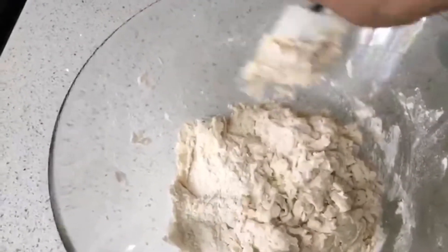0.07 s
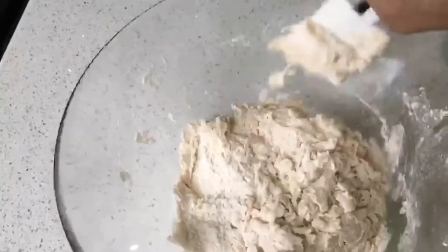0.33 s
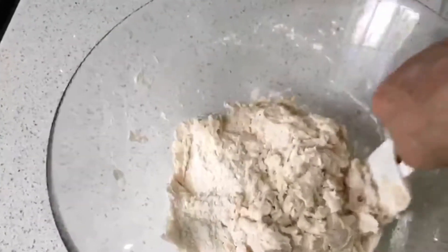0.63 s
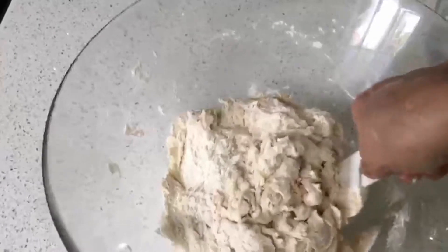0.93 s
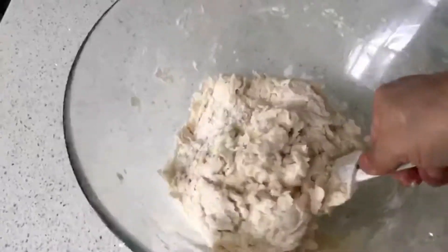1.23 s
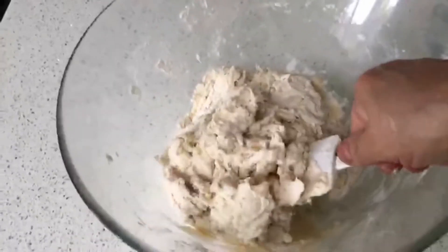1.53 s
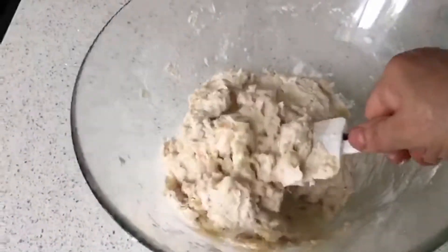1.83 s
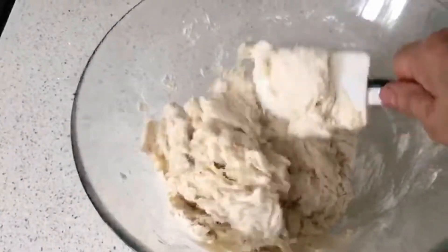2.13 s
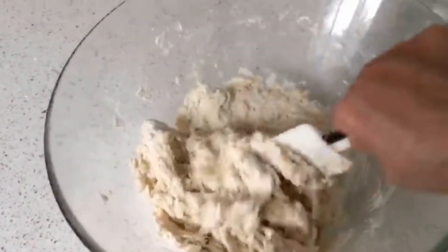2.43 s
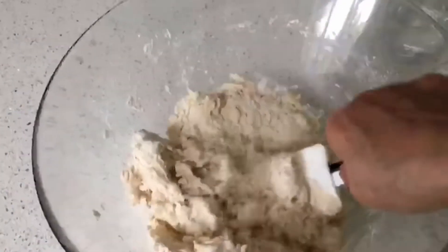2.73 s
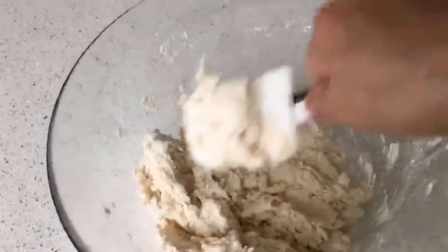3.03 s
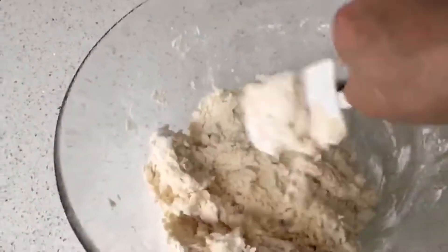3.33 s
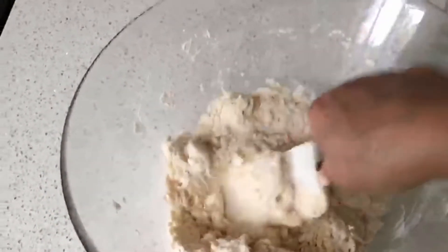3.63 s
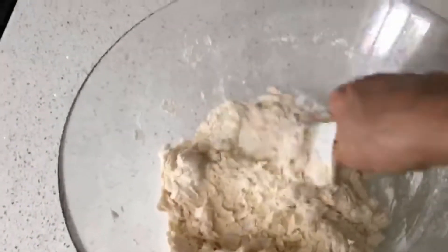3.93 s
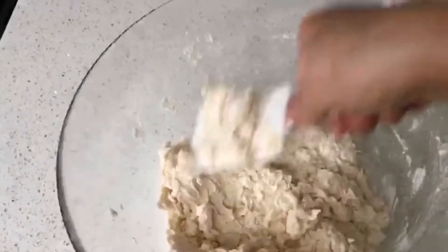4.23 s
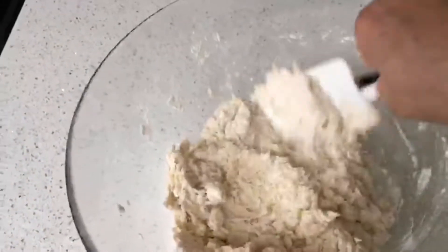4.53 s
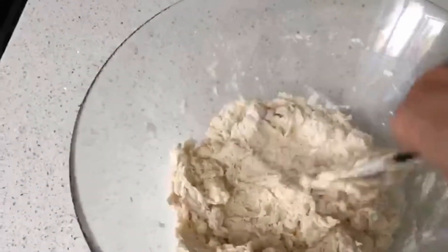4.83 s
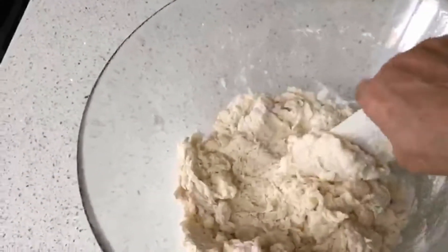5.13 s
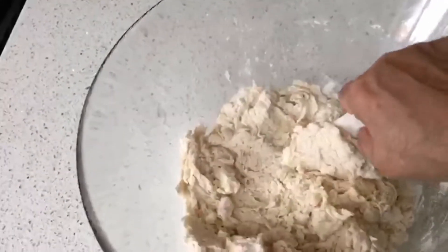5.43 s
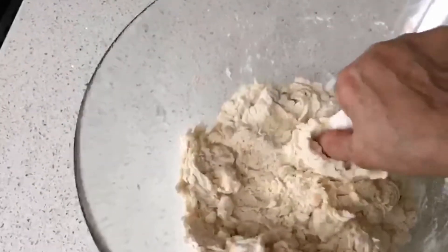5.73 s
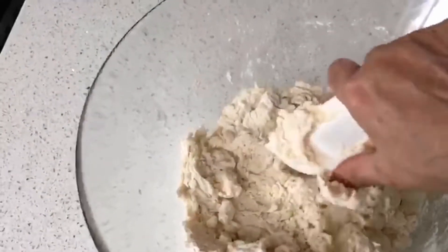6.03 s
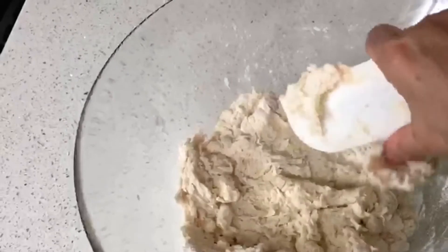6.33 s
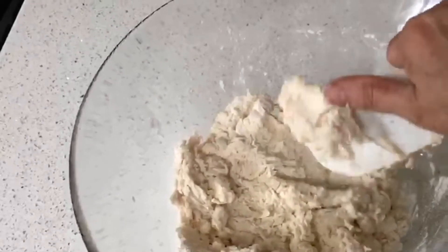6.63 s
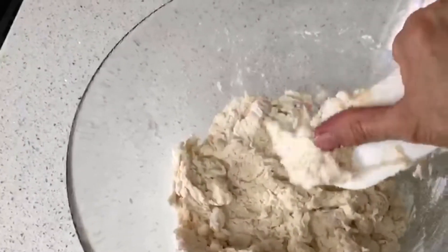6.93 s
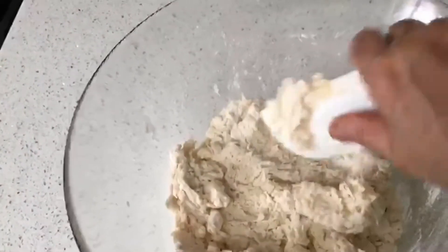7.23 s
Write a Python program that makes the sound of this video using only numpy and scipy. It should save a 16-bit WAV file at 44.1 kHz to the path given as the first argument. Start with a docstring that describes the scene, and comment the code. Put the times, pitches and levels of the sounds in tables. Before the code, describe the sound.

In a small kitchen with a faint appliance hum, a spatula pushes through dough in a glass bowl, making cushioned thuds, quiet scrapes and little wet pops, all heard up close. Twice the bowl tips and rattles back onto the counter, once early and once past the middle, right after a bright clink of the handle. A thud with a lighter clink follows, then near silence until a last soft scrape and bump.

```python
"""A spatula folds soft dough in a glass bowl on a kitchen counter, close to the microphone.
Twice the bowl tips and its foot clatters back: the impacts excite the modes of the glass and the counter.
The hard handle clinks on the glass, while blows cushioned by dough give dull thuds.
Friction makes the blade scrape, and air pockets resonate with a pop as the sticky dough lets go.
An appliance hums faintly in the small, reverberant room."""
import sys
import numpy as np
from scipy import signal
from scipy.fft import rfft, irfft
from scipy.io import wavfile

SR = 44100
rng = np.random.default_rng(int(sys.argv[2]) if len(sys.argv) > 2 else 0)


def transcribe(u):
    """Save the signal u as a 16-bit wav file named by the first command-line argument.

    u: samples, shape (n,) or (channels, n), limited to [-1, 1]; the rate is SR.
    q: integer samples, one column per channel.
    """
    v = np.clip(np.atleast_2d(u).T, -1, 1)
    q = np.round(v * 32767).astype(np.int16)
    wavfile.write(sys.argv[1], SR, q)


N = 320607
TIME = np.arange(N) / SR
AGE = np.arange(SR) / SR  # the second that follows a blow


def amp(db):
    """Amplitude ratio of a level in decibels."""
    return 10 ** (np.asarray(db) / 20)


def unit_rms(x):
    """Normalisation to rms 1."""
    return x / np.sqrt(np.mean(x ** 2) + 1e-20)


def curve_at(points, hz):
    """Interpolation on a log-frequency axis."""
    f, value = np.transpose(points)
    return np.interp(np.log(hz + 1), np.log(f), value)


def add(mix, t, sound):
    """Superposition: a sound joins the mix at t seconds."""
    part = mix[max(round(t * SR), 0):][:len(sound)]
    part += sound[:len(part)]


def shape_steady(x, spectrum):
    """Zero-phase filtering gives a steady sound its spectrum."""
    return irfft(rfft(x) * amp(curve_at(spectrum, np.fft.rfftfreq(len(x), 1 / SR))), len(x))


def shape_blow(x, spectrum, size=4096):
    """Minimum-phase filtering is causal: it colours a blow without smearing the attack backwards."""
    log_gain = np.log(amp(curve_at(spectrum, abs(np.fft.fftfreq(size, 1 / SR)))))
    taps = np.fft.ifft(np.exp(np.conj(signal.hilbert(log_gain)))).real
    return signal.fftconvolve(x, taps[:size // 2])[:len(x)]


def drift(hz):
    """Low-passed noise: a random fluctuation of rms 1 and bandwidth about hz."""
    lowpass = np.exp(-(np.fft.rfftfreq(N, 1 / SR) / hz) ** 2)
    return unit_rms(irfft(rfft(rng.standard_normal(N)) * lowpass, N))


def soft_contact(x, corner_hz):
    """A contact of finite duration acts as a low-pass filter."""
    return signal.sosfilt(signal.butter(2, corner_hz, fs=SR, output="sos"), x)


def ring(hz, t60, db, twin=0, split_hz=0):
    """Damped modes; asymmetry splits each into a beating pair, split_hz apart at 1 kHz."""
    phase = 2 * np.pi * hz[:, None] * AGE
    beat = 2 * np.pi * split_hz * np.sqrt(hz[:, None] / 1000) * AGE
    fade = amp(db[:, None] - 60 * AGE / t60[:, None])
    sign = (-1) ** np.arange(len(hz))[:, None]  # neighbouring modes start in opposite directions
    return (sign * fade * (np.sin(phase) + twin * np.sin(phase + beat))).sum(0)


def burst(t60, passes=4):
    """Densely overlapping modes act as decaying noise: even spectrum, energy 1."""
    fade = amp(-60 * AGE / t60)
    x = rng.standard_normal(SR) * fade
    for _ in range(passes):
        whitened = irfft(np.exp(1j * np.angle(rfft(x))), SR)
        x = whitened * np.sqrt(fade)
    return x / np.linalg.norm(x)


# Reverberation time of the kitchen: f/Hz, T60/s
ROOM_DECAY = [(100, 0.93), (300, .42), (700, 0.48), (1800, 0.64), (4500, 0.53), (10000, 0.63)]
def echoes(rise_s=0.012):
    """Diffuse impulse response of energy 1: each band decays at its own rate."""
    hz, t, bands = signal.stft(rng.standard_normal(SR), SR, nperseg=256)
    bands = bands * amp(-60 * t / curve_at(ROOM_DECAY, hz)[:, None])
    tail = signal.istft(bands, SR, nperseg=256)[1][:SR] * (1 - np.exp(-(AGE / rise_s) ** 2))
    return tail / np.linalg.norm(tail)


def in_room(x, room_db):
    """Direct sound plus the reverberant field, by convolution."""
    return x + amp(room_db) * signal.fftconvolve(x, echoes())[:len(x)]


# Spectra of the room air and the rumble, and partials of the hum: f/Hz, level/dB
AIR_SPECTRUM = [(8.8, -29), (15, 1), (146, -14.5), (263, -23.5), (293, -11), (319, -17), (398, -22.5),
                (433, -21.5), (734, -28.5), (867, -31), (1280, -34.5), (1550, -38), (2360, -39.5),
                (2790, -40.5), (11500, -49), (15000, -71.5), (22000, -120)]
RUMBLE_SPECTRUM = [(3, 0), (10, 5.5), (20, -12), (50, -19), (100, -32.5), (200, -62.5)]
HUM_PARTIALS = [(296.1, -76.5), (317.6, -87), (430.7, -76), (861.3, -89.5), (1545, -95.5)]
def kitchen(air_db=-66, rumble_db=-57, swell_db=2, waver=0.12, wander_hz=0.17):
    """Noise floor: room air, an uneven rumble and the wavering line spectrum of an appliance."""
    air = shape_steady(rng.standard_normal(N), AIR_SPECTRUM)
    highpass = signal.butter(4, 100, "high", fs=SR, output="sos")
    air /= np.std(signal.sosfilt(highpass, air))  # rms 1 above 100 Hz
    rumble = unit_rms(shape_steady(rng.standard_normal(N), RUMBLE_SPECTRUM) * amp(swell_db * drift(3)))
    hum = np.zeros(N)
    for hz, db in HUM_PARTIALS:
        envelope = 1 + waver * drift(5)
        phase = 2 * np.pi * np.cumsum(hz + wander_hz * drift(3)) / SR
        hum += amp(db) * unit_rms(envelope * np.sin(phase))
    return amp(air_db) * air + amp(rumble_db) * rumble + hum


def stroke_pressure(start, length, attack_s=0.038, sag_db=-4, release_s=0.04):
    """Contact pressure as an envelope: the blade bites, eases off along the stroke and lifts."""
    age = np.maximum(TIME - start, 0)
    attack = np.minimum(age / attack_s, 1)
    hold = amp(sag_db * np.minimum(age / length, 1))
    release = np.exp(-np.maximum(age - length, 0) / release_s)
    return attack * hold * release


# Spectrum of the friction: f/Hz, level/dB
FRICTION_SPECTRUM = [(300, -4.5), (900, 4), (1500, -2), (2500, 0.5), (3500, -1.5), (4800, -4.5),
                     (6200, -14), (11000, -17.5)]
# Strokes of the blade: t/s, duration/s, relative level/dB, brightness/dB
BLADE_STROKES = [(0, .1, -72, 0), (0.091, 0.07, -62, 0.5), (0.38, 0.058, -60.5, 2), (0.462, 0.32, -69, -6),
                 (1.035, 0.25, -73, -6.5), (2.39, 0.17, -70.5, -2), (2.545, 0.076, -69, 1),
                 (2.66, 0.27, -75.5, -7), (3.08, .2, -78, 3), (3.407, .28, -76.5, -7), (3.88, .2, -75.5, 4),
                 (4.5, .2, -79.5, 3), (7.128, .14, -76, -4)]
def blade_scrapes(level_db=-3, slips_per_s=900, spread_db=4, smear=0.7, judder_db=2, pivot_hz=3000):
    """Stick-slip friction: countless tiny slips of the blade over the hiss of smeared dough."""
    slips = (rng.random(N) < slips_per_s / SR) * rng.choice([-1, 1], N)
    slips = slips * amp(spread_db * np.minimum(rng.exponential(1, N), 4))
    friction = (unit_rms(slips) + smear * rng.standard_normal(N)) * amp(judder_db * drift(40))
    friction = unit_rms(shape_steady(friction, FRICTION_SPECTRUM))
    lows = signal.sosfiltfilt(signal.butter(1, pivot_hz, fs=SR, output="sos"), friction)
    out = np.zeros(N)
    for start, length, db, bright_db in BLADE_STROKES:
        # bare glass hisses brightly, a layer of dough dulls the stroke
        tilted = lows / amp(bright_db) + (friction - lows) * amp(bright_db)
        out += amp(db) * stroke_pressure(start, length) * tilted
    return amp(level_db) * in_room(out, room_db=-3)


# Spectrum of a snapping skin of dough: f/Hz, level/dB
SNAP_SPECTRUM = [(100, -20), (600, 1), (1500, 1.5), (4500, -10), (9000, -18.5)]
# Dough lets go of the blade: t/s, pocket level/dB, f/Hz, ring time/s, relative snap level/dB
DOUGH_POPS = [(.327, -61, 1600, 0.0041, -27), (1.078, -62.5, 3600, .004, -19.5),
              (2.557, -52.5, 1810, 0.0041, -18), (2.572, -56, 2640, 0.0032, -19),
              (2.6264, -45, 2640, 0.0012, -16), (2.7497, -48, 2000, 0.0042, -21),
              (2.7912, -36, 1310, 0.0026, -4.5), (2.7913, -52, 2280, 0.0062, -12),
              (3.086, -61, 1400, 0.0067, -21), (3.906, -59, 1890, 0.0033, -14.5)]
def dough_pops(snap_t60=0.006, snap_level_db=-16):
    """Cavity resonance: a skin of dough snaps and the air pocket behind it rings for a few cycles."""
    out = np.zeros(N)
    for t, db, hz, ring_s, snap_db in DOUGH_POPS:
        decay = AGE * np.log(1000) / ring_s  # age in time constants
        add(out, t, amp(db) * decay * np.exp(1 - decay) * np.sin(2 * np.pi * hz * AGE))
        snap = soft_contact(shape_blow(burst(snap_t60), SNAP_SPECTRUM), 2 * hz)
        add(out, t, amp(snap_db + snap_level_db) * snap)
    return in_room(out, room_db=-6)


# Modes of the laden bowl bouncing on the counter: f/Hz, T60/s, level/dB
BOUNCE_MODES = [(142, 0.17, -39.5), (290, .25, -51.5), (462, .33, -44), (830, .25, -52.5)]
# Spectrum of a cushioned blow: f/Hz, level/dB
THUMP_SPECTRUM = [(30, -0.5), (110, 4), (220, 6.5), (420, 10.5), (800, 6), (1400, -5.5), (2200, -15),
                  (5000, -17.5)]
# The blade pushes the bowl through the dough: t/s, thump level/dB, bounce level/dB, corner f/Hz
BLADE_PUSHES = [(.166, -17.5, -14.5, 634), (0.373, -17, -14.5, 690), (.494, -11, -12.5, 870),
                (0.513, -15, -23, 895), (1.187, -18.5, -36, 1220), (1.205, -23, -33, 700),
                (1.928, -12, -23, 396), (1.962, -23, -3.5, 198), (3.540, -12.5, -7.5, 410),
                (4.287, -13.5, -30.5, 1000), (4.321, -4.5, 1.5, 1334), (4.354, -12.5, -12.5, 700),
                (5.186, -5, -6, 610), (7.257, -26, -24, 1100)]
def dough_thuds(thump_t60=0.085, room_db=-1, swell_cycles=4, bounce_db=5, contact_cycles=3):
    """Cushioned impact: dough lengthens the contact, so the bowl bounces dully in its low modes."""
    out = np.zeros(N)
    bounce = sum(ring(*np.transpose([mode])) * (1 - np.exp(-AGE * mode[0] / swell_cycles))
                 for mode in BOUNCE_MODES)
    for t, thump_db, ring_db, corner_hz in BLADE_PUSHES:
        press = 1 - np.exp(-AGE * corner_hz / contact_cycles)  # a softer contact builds up more slowly
        thump = shape_blow(burst(thump_t60) + amp(room_db) * echoes(), THUMP_SPECTRUM) * press
        thud = amp(thump_db) * thump + amp(ring_db + bounce_db) * in_room(bounce, room_db=-9)
        add(out, t, soft_contact(thud, corner_hz))
    return out


# Modes of the glass, for handle and foot alike: f/Hz, T60/s, level/dB struck at foot, at rim, on wall
GLASS_MODES = [(153, 0.42, -37, -43, -52), (235, 0.36, -38, -56, -63), (395, 0.33, -21, -31, -62),
               (459, 0.33, -22, -31, -59), (540, 0.3, -26, -52, -56), (606, 0.32, -22, -38, -62),
               (630, 0.34, -23, -44, -54), (722, 0.28, -31, -26, -48), (839, 0.33, -19, -32, -54),
               (911, 0.32, -30, -48, -64), (1128, 0.32, -30, -44, -63), (1259, 0.48, -41, -35, -43),
               (1350, 0.36, -32, -54, -64), (1421, 0.38, -28, -53, -68), (1698, 0.4, -34, -53, -66),
               (1868, 0.36, -31, -42, -58), (1891, 0.4, -42, -36, -34), (2353, 0.34, -35, -54, -69),
               (2546, 0.34, -47, -26, -52), (2609, 0.52, -46, -31, -30), (3158, 0.2, -56, -26, -51),
               (3446, 0.33, -42, -26, -31), (4402, 0.36, -56, -32, -42), (5076, 0.22, -65, -38, -60),
               (5448, 0.34, -69, -46, -55), (5890, 0.36, -58, -45, -61), (6627, 0.33, -82, -33, -67),
               (7897, 0.36, -84, -46, -70), (9243, 0.25, -89, -43, -79), (10720, 0.24, -70, -43, -80)]
# Spectrum of a hard blow: f/Hz, level/dB
CRACK_SPECTRUM = [(30, 10), (200, 6), (450, 14), (800, 19.5), (1200, 14.5), (2000, 13.5), (3100, 24.5),
                  (3800, 15.5), (4500, 18.5), (6500, 3.5), (7400, 1), (9000, -6.5), (11000, -2.5),
                  (12000, -21.5)]
# The handle strikes: t/s, crack level/dB, ring level/dB, corner f/Hz, place (0 rim, 1 wall)
HANDLE_STRIKES = [(4.6991, -3, -4.5, 11670, 0.018), (5.1778, -21.5, -6.5, 3930, 0.93)]
def handle_clinks(crack_t60=0.037, room_db=-5, contact_s=0.0005, excess=0.41, excess_s=0.049):
    """Modal excitation: the point where the hard handle strikes sets the strength of each mode."""
    out = np.zeros(N)
    hz, t60, _, rim_db, wall_db = np.transpose(GLASS_MODES)
    # the ring starts within the contact time and drops quickly at first, while the handle still damps it
    onset = (1 - np.exp(-(AGE / contact_s) ** 2)) * (1 + excess * np.exp(-AGE / excess_s))
    for t, crack_db, ring_db, corner_hz, place in HANDLE_STRIKES:
        mode_db = rim_db + place * (wall_db - rim_db)
        glass = onset * ring(hz, t60, mode_db, twin=0.57, split_hz=3.2)
        crack = shape_blow(burst(crack_t60) + amp(room_db) * echoes(), CRACK_SPECTRUM)
        crack = soft_contact(crack, corner_hz)
        add(out, t, amp(crack_db) * crack + amp(ring_db) * in_room(glass, room_db=-14))
    return out


# Spectra of the clattering foot and the booming counter: f/Hz, level/dB
CLATTER_SPECTRUM = [(30, -0.5), (100, 6), (200, 12), (310, 20), (410, 32.5), (650, 33.5), (1050, 24.5),
                    (1400, 24.5), (2000, 20.5), (2900, 11.5), (3700, 10.5), (4400, 2.5), (7000, -4),
                    (11000, -4.5)]
COUNTER_SPECTRUM = [(20, 17), (55, 20.5), (95, 17), (140, 7.5), (300, 11.5), (600, -12.5), (3000, -39)]
# The foot lands: t/s, clatter level/dB, ring level/dB, corner f/Hz, boom level/dB
FOOT_IMPACTS = [(1.3416, -8.5, -8.5, 904, -14.5), (1.3436, -0.5, -3, 3063, -5.5),
                (1.35, -6, -15.5, 3190, -13.5), (1.3533, -5.5, -8.5, 3600, -9.5),
                (1.3660, -1, -3, 2600, -7), (1.376, -1, -4.5, 2600, -9.5), (4.7633, -2, -12, 3000, -5.5),
                (4.7680, -1.5, -2, 3450, -7), (4.7730, -5, -3.5, 3600, -3), (4.7904, -0.5, -6, 2680, 1),
                (4.7980, -1.5, -3, 2412, -11.5)]
def bowl_knocks(rattle_t60=0.053, build_s=0.003, boom_t60=0.3, excess=1.8, excess_s=0.023, glass_db=-4.5):
    """Repeated impact: the tipped bowl chatters on the counter, each bounce adding energy to its modes."""
    clatter, glass, boom = np.zeros((3, N))
    build = 1 - np.exp(-AGE / build_s)  # the heavy bowl takes a moment to get moving
    for t, clatter_db, _, corner_hz, boom_db in FOOT_IMPACTS:
        rattle = shape_blow(burst(rattle_t60), CLATTER_SPECTRUM) * build
        add(clatter, t, amp(clatter_db) * soft_contact(rattle, corner_hz))
        add(boom, t, amp(boom_db) * shape_blow(burst(boom_t60), COUNTER_SPECTRUM))
    onset = build * (1 + excess * np.exp(-AGE / excess_s))  # dough soaks up the first wide swings quickly
    for hz, t60, foot_db, _, _ in GLASS_MODES:
        envelope = onset * amp(foot_db - 60 * AGE / t60)
        energy = np.zeros(N)
        for t, _, ring_db, _, _ in FOOT_IMPACTS:
            add(energy, t, (amp(ring_db) * envelope) ** 2)
        glass += np.sqrt(energy) * np.sin(2 * np.pi * (hz * TIME + rng.random()))
    return in_room(clatter, room_db=-6) + amp(glass_db) * in_room(glass, room_db=-14) + boom


def scene():
    """Superposition of bowl, dough and kitchen at one microphone."""
    return (bowl_knocks() + handle_clinks() + dough_thuds() + dough_pops() + blade_scrapes() + kitchen())[None]


def record(dry, ceiling=0.64, edge_hz=11900):
    """Soft saturation rounds the loudest peaks; a low-pass filter then limits the band."""
    rounded = dry / (1 + (dry / ceiling) ** 4) ** (1 / 4)
    lowpass = signal.firwin(401, edge_hz, window=("kaiser", 9), fs=SR)
    return signal.oaconvolve(rounded, lowpass[None], "same")


dry = scene()
out = record(dry)
transcribe(out)
```